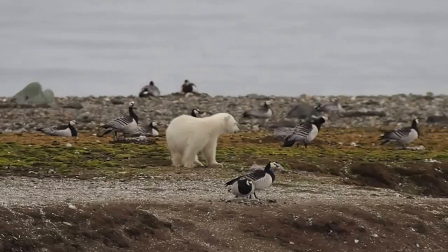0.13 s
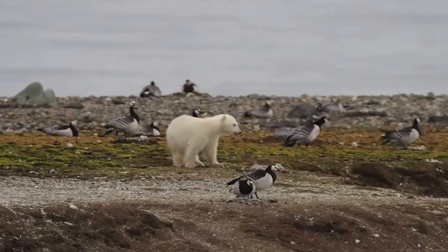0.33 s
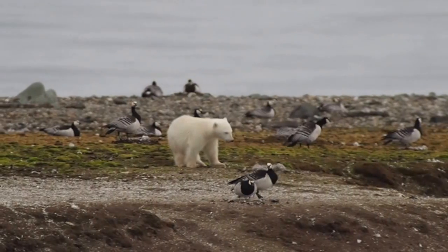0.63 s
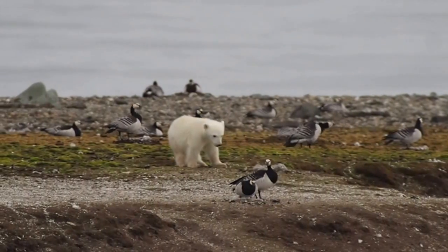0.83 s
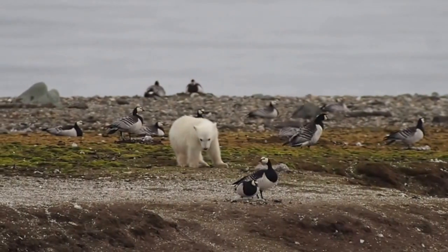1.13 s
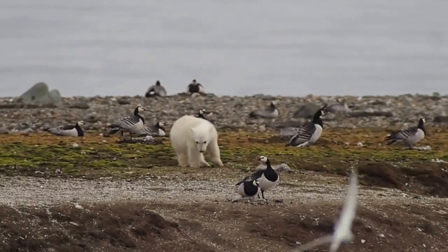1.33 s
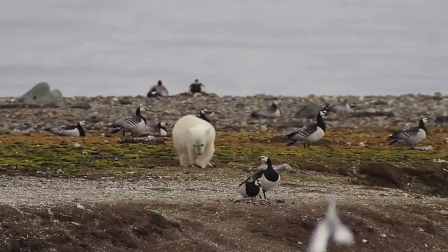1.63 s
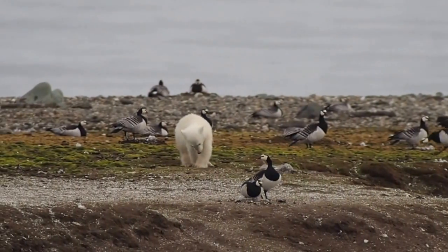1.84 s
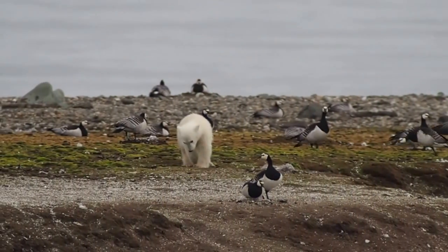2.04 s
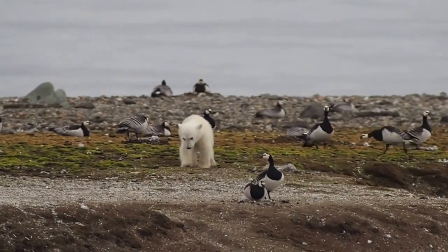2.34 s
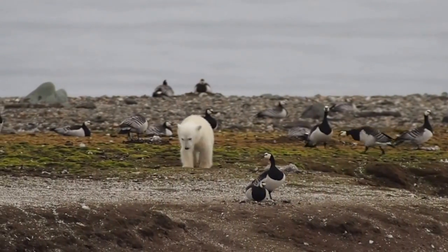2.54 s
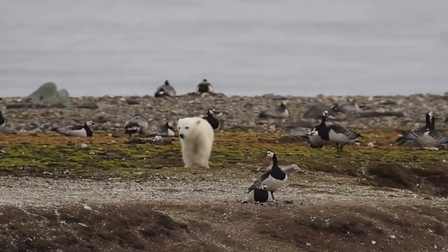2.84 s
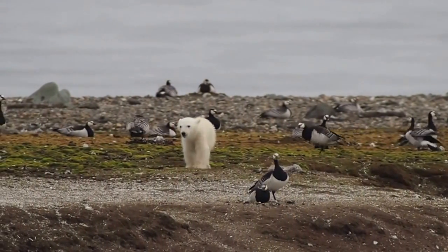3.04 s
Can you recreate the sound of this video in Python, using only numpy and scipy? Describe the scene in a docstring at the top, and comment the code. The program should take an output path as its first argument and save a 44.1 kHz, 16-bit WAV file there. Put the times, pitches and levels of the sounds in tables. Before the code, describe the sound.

Geese honking and yapping in overlapping bursts outdoors, with low wind rumble and microphone thumps

```python
"""Geese clamour on a windy shore some way off: hoarse honks (pulses ringing a throat resonance) and
clear arched yaps (summed overtones), scattered by the ground, over a babble of further birds.
A small shore bird trills and peeps in gliding sines. Wind rumbles (shaped noise), thumps and knocks
(short decaying sines) on two microphones, over steady hiss (shaped noise).
"""
import sys
import numpy as np
from scipy import signal
from scipy.fft import rfft, irfft
from scipy.io import wavfile
from scipy.ndimage import uniform_filter1d

SR = 44100
rng = np.random.default_rng(int(sys.argv[2]) if len(sys.argv) > 2 else 0)


def master(y):
    """Save y as 16-bit WAV."""
    cut = np.clip(np.atleast_2d(y).T, -1, 1)
    pcm = np.round(cut * 32767)  # scale
    wavfile.write(sys.argv[1], SR, pcm.astype(np.int16))


N = 140679
LEFT_RIGHT = np.array([[1], [-1]])


def undb(db):
    """Amplitude ratio of a level in dB."""
    return 10 ** (np.asarray(db) / 20)


def unit(x):
    """Scale to RMS 1."""
    return x / np.sqrt(np.mean(x ** 2) + 1e-20)


def colour(x, table):
    """Filter by f/Hz, level/dB points, interpolated over log frequency."""
    hz, db = np.array(table).T
    f = np.fft.rfftfreq(x.shape[-1], 1 / SR) + 1
    gain = undb(np.interp(np.log(f), np.log(hz + 1), db))
    return irfft(rfft(x) * gain, x.shape[-1])


def lowpass(x, order, hz):
    """Butterworth low-pass."""
    return signal.sosfilt(signal.butter(order, hz, fs=SR, output="sos"), x)


def ring(x, hz, width_hz):
    """A fixed resonance applied twice."""
    b, a = signal.iirpeak(hz, hz / width_hz, SR)
    return signal.lfilter(b, a, signal.lfilter(b, a, x))


def glide(x, hz, width_hz):
    """A resonance applied twice whose centre moves along hz: shift down, smooth, shift back."""
    turn = np.exp(2j * np.pi * np.cumsum(hz) / SR)
    pole = np.exp(-np.pi * width_hz / SR)
    smooth = signal.lfilter([1], np.convolve([1, -pole], [1, -pole]), x / turn)
    return (smooth * turn).real


def walk(rate_hz, size=N):
    """Smoothed random steps at rate_hz, RMS 1."""
    k = max(int(SR / rate_hz), 2)
    steps = np.repeat(rng.standard_normal(size // k + 1), k)
    return unit(uniform_filter1d(uniform_filter1d(steps, k), k)[:size])


def shape(t, length_s, attack_s, release_s):
    """Sine-squared fade in and out."""
    ramp = np.minimum(t / attack_s, (length_s - t) / release_s)
    return np.sin(np.pi / 2 * np.clip(ramp, 0, 1)) ** 2


def add(out, start_s, x):
    """Mix x into out from start_s, cut at the end."""
    i = int(start_s * SR)
    n = min(x.shape[-1], N - i)
    out[..., i:i + n] += x[..., :n]


HONK_SAG, HONK_SINK = .1, .2  # fall of pitch and of throat resonance through the call, shares
HONK_ROUGH, HONK_SMEAR_S = .24, .002
HONK_SWELL, HONK_FADE = .38, .42  # shares of the call
HONK_RING_HZ, HONK_WIDTH_HZ, HONK_SKIRT_DB = 250, 940, -1  # moving peak width; fixed skirt width, level
HONK_CHEST_HZ, HONK_CHEST_DB, HONK_RASP_HZ, HONK_RASP_DB = 950, -15.5, 2900, -26


def honk(length_s, hz, throat_hz, rasp_db):
    """Uneven pulses and a noise burst per cycle ring throat and chest; the pitch sags."""
    t = np.arange(int(length_s * SR)) / SR
    u = t / length_s
    drift = .16 * HONK_ROUGH * walk(hz, len(t))
    phase = np.cumsum(hz * (1 - HONK_SAG * (u - .5) + drift)) / SR
    cycle = phase % 1
    puff = np.exp(-cycle / .02) * undb(4 * HONK_ROUGH * walk(hz, len(t)))
    breath = np.exp(-cycle / .3) * rng.standard_normal(len(t))
    source = (1 - HONK_ROUGH) * unit(puff) + HONK_ROUGH * unit(breath)
    # a short random noise burst smears each pulse, softening its spikes
    smear = rng.standard_normal(300) * np.exp(-t[:300] / HONK_SMEAR_S)
    source = signal.fftconvolve(source, smear)[:len(t)]
    dull = lowpass(source, 3, 2500)
    peak = glide(dull, throat_hz * (1 - HONK_SINK * (u - .5)), HONK_RING_HZ)
    skirt = ring(dull, throat_hz, HONK_WIDTH_HZ)
    chest = ring(dull, HONK_CHEST_HZ, 770)
    rasp = lowpass(ring(source, HONK_RASP_HZ, 1300), 4, 4100)
    voice = unit(peak) + undb(HONK_SKIRT_DB) * unit(skirt) - undb(HONK_CHEST_DB) * unit(chest)
    voice = voice + undb(HONK_RASP_DB + rasp_db) * unit(rasp)
    swell = shape(t, length_s, HONK_SWELL * length_s, HONK_FADE * length_s) ** .7
    return voice * swell * undb(1.2 * walk(40, len(t)))


# hoarse honks: t/s, length/s, pulse f/Hz, throat f/Hz, level/dB, rasp level/dB re HONK_RASP_DB
HONKS = [(0.09, 0.084, 252.2, 1610, -33, 8), (0.319, 0.068, 237, 1755, -36.5, -7),
         (0.372, 0.095, 246, 1880, -40, -4), (0.428, 0.091, 231.2, 1625, -32.5, -14),
         (0.724, 0.088, 257.2, 1880, -38.5, 12), (0.808, 0.086, 242.8, 1480, -35.5, -10),
         (0.859, 0.099, 245, 1740, -36.5, -8), (1.023, 0.088, 258.6, 2020, -40.5, 7),
         (1.137, 0.0768, 245.9, 1584, -32.5, -8), (1.291, 0.1, 241.3, 1777, -40, -5),
         (1.404, 0.092, 234.1, 1570, -31.5, -11), (1.493, 0.081, 264.7, 1660, -45, -4.5),
         (1.669, 0.1025, 225.2, 1900, -40, 11.5), (1.785, 0.099, 246, 1614, -33.5, -13),
         (2.045, 0.059, 228, 2010, -39, 4), (2.106, 0.086, 244.8, 2230, -44.5, 25.5),
         (2.279, 0.14, 240.5, 1620, -45.5, 16.5), (2.384, 0.036, 228.8, 1580, -43, 21),
         (2.403, 0.068, 266, 2200, -46, 17), (2.543, 0.044, 240, 1830, -53, 6.5),
         (2.597, 0.068, 259.2, 1880, -39.5, -1), (2.666, 0.084, 235.2, 2260, -49, 21.5),
         (2.728, 0.12, 239, 2030, -54, 30.5), (2.94, 0.095, 250, 2200, -48, 23.5),
         (3.059, 0.077, 241.3, 1920, -46, 22)]


def honks():
    """The nearer geese's pulsed calls."""
    out = np.zeros(N)
    for start_s, length_s, hz, throat_hz, db, rasp_db in HONKS:
        add(out, start_s, undb(db) * honk(length_s, hz, throat_hz, rasp_db))
    return out


YAP_WIDTH_HZ, YAP_SKIRT_DB, YAP_HOARSE, YAP_EDGE_S = 780, -30, .25, .012


def yap(length_s, top_s, hz, bend_per_s2, throat_hz, width_hz=YAP_WIDTH_HZ):
    """Five overtones at most of an arched pitch, strongest near the throat resonance."""
    t = np.arange(int(length_s * SR)) / SR
    arch = np.clip(1 - bend_per_s2 * (t - top_s) ** 2, .6, 1)
    f = hz * arch * (1 + .003 * walk(120, len(t)))
    k = np.arange(1, 6)[:, None]
    gain = np.exp(-.5 * ((k * hz - throat_hz) / width_hz) ** 2) + undb(YAP_SKIRT_DB) / k
    gain = gain * (k * hz < 4800)
    overtones = gain * np.sin(2 * np.pi * k * np.cumsum(f) / SR + k ** 2)
    voice = unit(np.sum(overtones, axis=0))
    hoarse = 1 + YAP_HOARSE * walk(267.0, len(t))
    return voice * hoarse * shape(t, length_s, YAP_EDGE_S, YAP_EDGE_S)


# clear yaps: t/s, length/s, pitch-top t/s, pitch-top f/Hz, bend/(share per s^2), throat f/Hz, level/dB
YAPS = [(0.135, 0.095, 0.18, 1354, 86.4, 2100, -42.5), (0.211, 0.037, .235, 950, 69, 2090, -44.5),
        (0.465, 0.09, .515, 1363, 84.2, 2110, -42.5), (0.623, 0.046, .635, 855, 23, 1580, -43.5),
        (0.68, 0.07, .712, 1045, 50, 2590, -46), (0.783, 0.071, .76, 970, 13, 2580, -52),
        (0.823, 0.04, .865, 1300, 51, 2050, -42), (0.853, 0.033, .867, 905, 880, 1510, -33.5),
        (.895, 0.068, .915, 870, 19, 1490, -55), (.92, 0.07, .925, 1434, 32, 1900, -65),
        (1.004, 0.05, 1.01, 1096, 32, 2430, -44.5), (1.037, 0.091, 1.05, 1017, 3, 2000, -54),
        (1.123, 0.059, 1.147, 1165, 120, 3060, -52.5), (1.164, 0.06, 1.208, 1360, 110, 2150, -45.5),
        (1.202, 0.044, 1.19, 943, 38, 1710, -38.5), (1.265, 0.064, 1.275, 834.3, 22, 1500, -41),
        (1.445, 0.04, 1.445, 1100, 22.4, 2980, -53), (1.51, 0.049, 1.52, 857, 23, 1160, -41.5),
        (1.8, 0.068, 1.86, 1337, 38, 2260, -45.5), (1.994, 0.067, 2.0, 887, 15, 1700, -45),
        (2.039, 0.052, 2.08, 1148, 14, 1320, -43.5), (2.089, 0.055, 2.15, 1316, 82, 2080, -39),
        (2.127, 0.0425, 2.145, 719, 87.6, 1990, -50), (2.309, 0.0633, 2.36, 928, 16, 1430, -44),
        (2.361, 0.04, 2.382, 1150, 38, 2900, -51), (2.402, 0.068, 2.43, 793, 26, 1760, -48.5),
        (2.502, 0.043, 2.51, 1168, 21, 1280, -47), (2.664, 0.065, 2.7, 1177, 48, 1910, -50),
        (2.711, 0.077, 2.748, 1311, 72, 1800, -41), (2.819, 0.033, 2.83, 921, 36, 1800, -48),
        (2.89, 0.091, 2.925, 1208, 48, 1210, -46.5), (2.954, 0.055, 2.98, 763, 40, 1750, -47),
        (3.062, 0.03, 3.08, 768, 290, 1400, -48), (3.13, 0.054, 3.15, 1205, 24, 900, -46),
        (3.158, .04, 3.185, 887, 28, 1720, -46.5)]


def yaps():
    """The nearer geese's arched tonal calls."""
    out = np.zeros(N)
    for start_s, length_s, top_s, hz, bend_per_s2, throat_hz, db in YAPS:
        add(out, start_s, undb(db) * yap(length_s, top_s - start_s, hz, bend_per_s2, throat_hz))
    return out


TRILL_HZ, TRILL_DEPTH = 43, .97
# whistle breakpoints per trill: t/s, mean f/Hz, level/dB (amplitude doubled on playing)
TRILLS = [
    [(1.655, 3330, -57.5), (1.68, 3495, -51), (1.75, 3355, -54), (1.83, 3230, -52)],
    [(1.845, 3400, -58), (1.88, 3240, -51), (1.91, 3076, -53), (1.937, 2830, -54)],
    [(2.85, 3426, -55), (2.94, 3395, -55), (3.0, 3460, -52.5), (3.05, 3380, -56)],
]


def trills():
    """A shore bird's gliding whistle, chopped with a slight vibrato at the same rate."""
    out = np.zeros(N)
    for rows in TRILLS:
        s, hz, db = np.array(rows).T
        t = np.arange(s[0], s[-1], 1 / SR)
        beat = 2 * np.pi * TRILL_HZ * (t - s[0])
        f = np.interp(t, s, hz) * (1 + .0063 * np.sin(beat))
        chop = 1 - TRILL_DEPTH * (.5 + .5 * np.cos(beat)) ** 1.3
        whistle = np.sin(2 * np.pi * np.cumsum(f) / SR)
        add(out, s[0], 2 * undb(np.interp(t, s, db)) * chop * whistle)
    return out


# peeps: t/s, length/s, start f/Hz, end f/Hz, level/dB (2.5 dB lower on playing)
PEEPS = [(1.832, 0.033, 3860, 4400, -55), (1.978, 0.025, 3200, 3020, -46), (2.913, 0.0257, 4510, 4854, -54),
         (2.933, 0.03, 4000, 4400, -53), (3.013, 0.027, 4660, 5050, -55), (3.055, .012, 3700, 3800, -60.5),
         (3.14, 0.0105, 3300, 3300, -48), (3.17, 0.0155, 3170, 3120, -50)]


def peeps():
    """A shore bird's single short whistles, rising, level or falling."""
    out = np.zeros(N)
    for start_s, length_s, hz0, hz1, db in PEEPS:
        t = np.arange(int(length_s * SR)) / SR
        f = hz0 + (hz1 - hz0) * np.sin(np.pi / 2 * t / length_s)
        whistle = np.sin(2 * np.pi * np.cumsum(f) / SR)
        add(out, start_s, undb(db - 2.5) * whistle * shape(t, length_s, .0032, .0048))
    return out


SHORE_DB, SHORE_T60_S = -13, .12


def shore_scatter(birds):
    """The ground scatters the calls: a decaying noise response per side."""
    t = np.arange(int(.3 * SR)) / SR
    ground = rng.standard_normal((2, len(t))) * np.exp(-np.log(1000) * t / SHORE_T60_S)
    ground = ground / np.sqrt(np.sum(ground ** 2, axis=1, keepdims=True))
    return signal.fftconvolve(birds[None], ground, axes=1)[:, :N] * undb(SHORE_DB)


FLOCK_MURMUR_DB, FLOCK_SPREAD = -1.5, .5
# murmur spectrum: f/Hz, relative level/dB per Hz
FLOCK_SPECTRUM = [(240, -38), (400, -5.5), (538, -4), (803, 1.5), (1230, 4), (1450, -2), (1810, 2),
                  (2290, -6.5), (2920, -18), (5000, -29.5), (6500, -49), (11000, -120)]
# whole babble: t/s, level/dB
FLOCK_LEVEL = [(0.3, -39), (0.57, -36.5), (1.39, -38), (1.51, -37.5), (1.6, -46.5), (1.7, -37.5),
               (1.93, -40.5), (2.08, -39.5), (2.38, -41), (2.52, -41), (2.81, -39.5), (2.92, -43.5),
               (3.19, -39.5)]


def flock(count=210):
    """Many further birds overlap; the farthest melt into a noise murmur."""
    out = np.zeros((2, N))
    for n, (a, b, c, d, e) in enumerate(rng.random((count, 5))):
        length_s = .04 + .057 * a
        if n % 3 == 0:
            call = honk(length_s, 210 + 70 * b, 800 + 1200 * c, 0)
        else:
            call = yap(length_s, length_s * d, 700 + 450 * b, 30, 900 + 800 * c, 450)
        start_s = (n + e) / count * N / SR
        add(out, start_s, call * undb(-8 * d + 4.3 * (a - .5) * LEFT_RIGHT))
    # strong lift around 2.8 kHz, steep fall above
    calls = colour(out, [(300, 2.0), (2000, -1.0), (2800, 18.5), (5000, -33)])
    mid, side = colour(rng.standard_normal((2, N)), FLOCK_SPECTRUM)
    murmur = unit(mid + FLOCK_SPREAD * side * LEFT_RIGHT)
    babble = unit(calls) + undb(FLOCK_MURMUR_DB) * murmur
    s, db = np.array(FLOCK_LEVEL).T
    return unit(babble) * undb(np.interp(np.arange(N) / SR, s, db) + 1.2 * LEFT_RIGHT)


RUMBLE_DB, GUST_DB, GUST_HZ, RUMBLE_OPPOSED = -39.5, 2, 15, .033
# rumble spectrum: f/Hz, relative level/dB per Hz
WIND_SPECTRUM = [(8.8, -46), (15, -3.5), (70, -4.5), (124, -6.5), (145, -8.5), (189, -15), (329, -18),
                 (499, -19), (600, -17.5), (780, -14), (1320, -120)]


def wind_rumble():
    """Gusty low noise, drawn per microphone and slightly opposed between them."""
    table = WIND_SPECTRUM + [(900, -70)]  # placed last, out of order: holds -70 dB above 900 Hz
    sides = []
    for _ in range(2):
        noise = colour(rng.standard_normal(N), table)
        sides.append(unit(noise * undb(GUST_DB * walk(GUST_HZ))))
    out = np.array(sides)
    return (out - RUMBLE_OPPOSED * out[::-1]) * undb(RUMBLE_DB)


THUMP_RISE_S, THUMP_FALL_S, THUMP_SAG_PER_S, RIGHT_PITCH = .00078, .024, 6, .872
# wind thumps: t/s, level/dB, left f/Hz (starts 1.1 times higher, then sags), left minus right/dB
THUMPS = [(0.146, -36, 112.8, -16.5), (0.48, -32, 126, -7), (0.583, -25, 119, 10.5), (0.649, -33, 124, 2),
          (1.11, -32, 106, 2), (1.235, -14.5, 143, 5.5), (1.257, -12.5, 123.1, 6), (1.71, -37, 117, 20.5),
          (2.055, -28, 125.5, 9), (2.142, -29, 100, -6), (2.222, -31.5, 109.3, -1), (2.389, -36, 125, -1),
          (2.709, -37, 151, 10)]


def wind_thumps():
    """Wind hits of a few sagging low cycles, lower in pitch on the right."""
    out = np.zeros((2, N))
    t = np.arange(int(.06 * SR)) / SR
    swell = (1 - np.exp(-t / THUMP_RISE_S)) ** 2 * np.exp(-(t / THUMP_FALL_S) ** 2)
    swell = swell / swell.max()
    pitch = np.array([[1], [RIGHT_PITCH]])
    for start_s, db, hz, pan_db in THUMPS:
        cycles = hz * t * (1.1 - THUMP_SAG_PER_S * t / 2) * pitch
        add(out, start_s, swell * np.sin(2 * np.pi * cycles) * undb(db + pan_db * LEFT_RIGHT / 2))
    return out


# sharper wind knocks: t/s, level/dB (envelope peaks 1.9 dB lower), f/Hz
KNOCKS = [(1.234, -17, 351), (1.257, -25, 300)]


def wind_knocks():
    """Short decaying sines, opposite in sign on the two microphones."""
    out = np.zeros((2, N))
    t = np.arange(int(.06 * SR)) / SR
    envelope = t / .00397 * np.exp(1 - t / .0032)
    for start_s, db, hz in KNOCKS:
        add(out, start_s, undb(db) * envelope * np.sin(2 * np.pi * hz * t) * LEFT_RIGHT)
    return out


HISS_DB = -56
# hiss spectrum: f/Hz, relative level/dB
HISS_SPECTRUM = [(2060, -6), (3500, -3.5), (4020, -7), (5260, -8), (11400, -10), (14900, -12),
                 (15700, -16.5)]
# left-right difference: f/Hz, level/dB re hiss spectrum
HISS_SIDE = [(3500, 3), (8000, -1.5), (12000, -5), (15700, -17)]


def hiss():
    """Steady recorder noise, more alike left and right at the top."""
    mid, side = colour(rng.standard_normal((2, N)), [(1500, -17)] + HISS_SPECTRUM)
    return unit(mid + colour(side, HISS_SIDE) * LEFT_RIGHT) * undb(HISS_DB)


GEESE_PAN_DB = 4.5  # left minus right


def scene():
    """Near geese lean left, shore bird central; scatter, flock, wind and hiss on both sides."""
    geese = honks() + yaps()
    shore_bird = trills() + peeps()
    near = geese * undb(LEFT_RIGHT * GEESE_PAN_DB / 2) + shore_bird
    wind = wind_rumble() + wind_thumps() + wind_knocks()
    return near + shore_scatter(geese + shore_bird) + flock() + wind + hiss()


START_S, TOP_HZ = .1165, 15800


def record(dry):
    """The sound starts abruptly after a moment of silence; the top is cut."""
    on = np.clip((np.arange(N) / SR - START_S) / .003, 0, 1)
    top_cut = signal.ellip(10, .2, 80, TOP_HZ, fs=SR, output="sos")
    return signal.sosfilt(top_cut, dry * on)


dry = scene()
out = record(dry)
master(out)
```